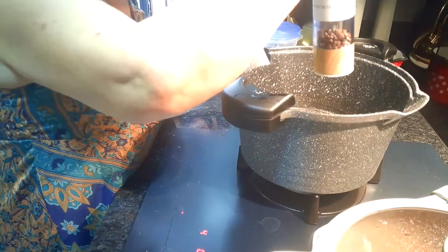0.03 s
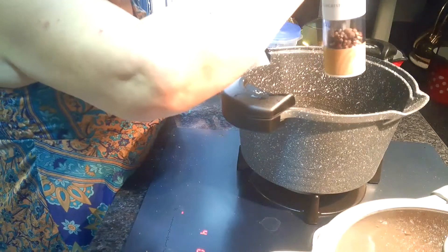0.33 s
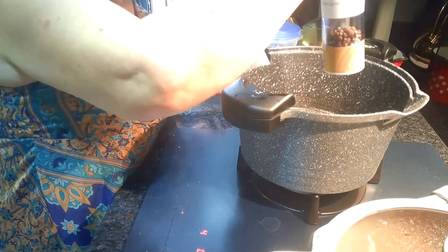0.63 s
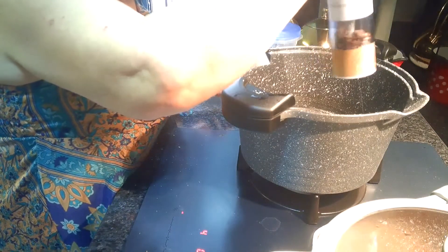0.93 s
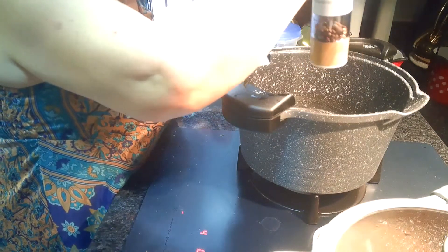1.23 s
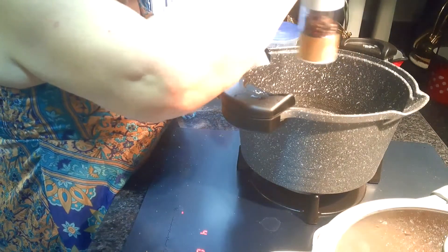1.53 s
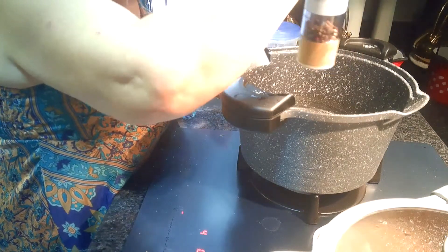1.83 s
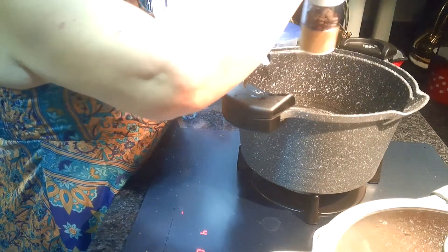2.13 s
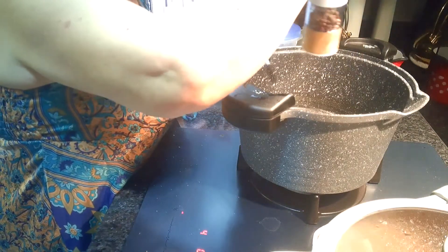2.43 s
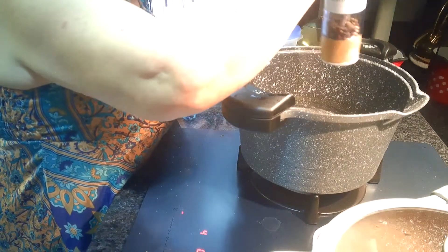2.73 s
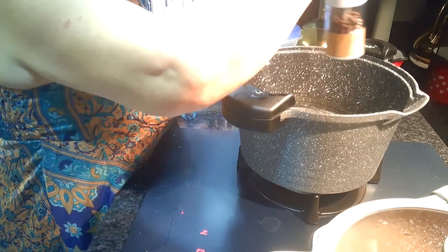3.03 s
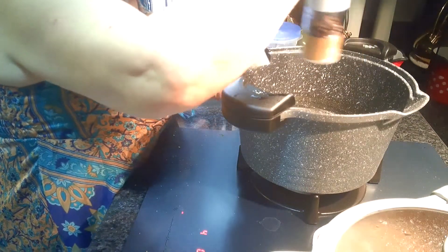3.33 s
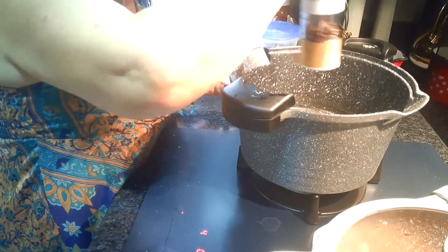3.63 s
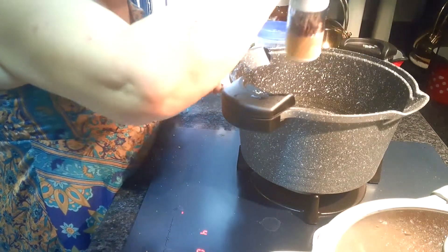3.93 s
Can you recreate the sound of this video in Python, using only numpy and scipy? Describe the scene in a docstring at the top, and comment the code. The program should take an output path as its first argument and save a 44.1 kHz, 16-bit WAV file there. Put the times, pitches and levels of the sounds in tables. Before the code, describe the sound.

A small electric spice grinder runs close by in a kitchen, its whine rising and sagging over a plastic gear chatter. Grains squeak faintly and crack now and then, loudest just past halfway as the motor strains.

```python
"""A small battery spice grinder runs over a pot in a kitchen. Its motor whines in harmonics of the
shaft rate, which sags as the burr bites. The gear teeth sing at multiples of the tooth rate, and their
impacts chatter through the resonances of the plastic housing. Now and then a grain squeaks under
friction or cracks. Short reflections follow the grinder; under it lie faint mains hum and room rumble."""
import sys
import numpy as np
from scipy import signal
from scipy.fft import rfft, irfft
from scipy.io import wavfile
from scipy.ndimage import uniform_filter1d

SR = 44100
rng = np.random.default_rng(int(sys.argv[2]) if len(sys.argv) > 2 else 0)


def unload_audio(sound):
    """Save the sound as a 16-bit wav file, at the path given as the first command line argument."""
    columns = np.transpose(np.atleast_2d(sound))
    # keep every value between -1 and 1, then stretch to whole-number steps
    steps = np.round(np.clip(columns, -1, 1) * 32767)
    wavfile.write(sys.argv[1], SR, steps.astype(np.int16))


N = 176400
T = np.arange(N) / SR
PINION_TEETH, TREBLE_FROM_HZ = 11, 3700

# mains harmonics: pitch_hz, level_db
HUM_PARTIALS = [(50, -55.3), (100, -63.5), (200, -69)]
# spectrum of the room rumble: frequency_hz, relative_db
RUMBLE_SPECTRUM = [(10, -10.5), (28, -3), (50, -7), (75, -10), (140, -13), (300, -16), (1000, -15.5),
                   (8000, -39)]
# grains rubbing the burr: start_s, length_s, level_db
SQUEAKS = [(.84, .04, -38), (1.08, .09, -39), (1.94, .11, -35), (3.07, .11, -33.5), (3.218, .02, -32),
           (3.235, .021, -25.5)]
# modes of the rubbed burr: pitch_hz, relative_db
BURR_MODES = [(2325, 2), (5550, 1), (7750, -7)]
# bright ticks of snapping grains: start_s, level_db
TICKS = [(2.202, -22), (2.398, -22), (3.259, -33), (3.643, -40)]
# spectrum of a tick: frequency_hz, relative_db
TICK_SPECTRUM = [(2000, -12), (4000, 2), (6500, 2), (10000, -1), (16000, -11)]
# grains breaking: start_s, level_db, decay_s, tilt_db_per_octave, relative_thump_db
CRACKS = [(.856, -30, .008, 0, -16), (2.086, -28, .009, -1, -9), (2.102, -34, .005, -3, 0),
          (2.2012, -8.5, .003, 1.5, -20), (2.2042, -10, .0032, 1.5, -18), (2.213, -24, .004, 0, -15),
          (2.398, -20, .003, 4, -12), (3.228, -18, .0025, -2, -10), (3.2562, -18, .002, 3, -20),
          (3.2582, -16.5, .005, 4, -14), (3.312, -23, .003, -3, -9), (3.508, -25, .003, -2, -9),
          (3.84, -25, .003, -3, -9)]
# response of the grinder's body to a knock: frequency_hz, relative_db
THUMP_SPECTRUM = [(60, -26), (170, -4), (260, -1.5), (500, 8), (900, 12), (1500, 8.5), (3000, -56)]
# response of the housing to impacts: frequency_hz, relative_db
HOUSING_SPECTRUM = [(100, -33), (330, -48.5), (470, -23.5), (570, -21.5), (720, -12.5), (1030, -10.5),
                    (1200, -13.5), (1430, -11.5), (1600, -2), (1900, -2), (2130, -7.5), (2330, -4.5),
                    (3000, -1.5), (3600, -5.5), (4200, -10), (4800, -10), (5650, -15), (6400, -12.5),
                    (7100, -18.5), (8200, -16.5), (9300, -20), (10800, -24), (11700, -36), (12800, -32),
                    (13800, -46), (16000, -44)]
# narrow housing resonances: pitch_hz, bandwidth_hz, relative_db
HOUSING_MODES = [(2320, 70, -16), (5570, 170, -14), (5930, 80, -19)]
# response of the housing to a tone: pitch_hz, gain_db
HOUSING_TONE_GAIN = [(200, -52), (420, -29.5), (520, -26), (595, -18.5), (680, -11.5), (900, -11.5),
                     (1150, -14.5), (1320, -6.5), (1470, -16), (1630, -5.5), (2020, -8), (2140, -12.5),
                     (2290, -7.5), (2900, -8), (3500, -16.5), (4000, -14.5), (4530, -18.5), (4850, -14.5),
                     (5600, -13.5), (6200, -26.5), (6900, -15.5), (7600, -17.5), (9300, -22), (11000, -40)]
# loudness of the gear train in two bands: time_s, middle_db, treble_db
GEAR_LEVELS = [(0.0, -29, -33), (0.07, -23.5, -28), (0.22, -28, -31.5), (0.51, -27, -30.5),
               (0.8, -27.5, -35), (0.82, -30.5, -36), (0.859, -24, -29), (0.88, -27.5, -35.5),
               (0.97, -29.5, -32.5), (1.01, -30, -36), (1.11, -26, -29), (1.39, -25.5, -29),
               (1.46, -29, -31.5), (1.54, -26, -29), (1.76, -28, -32), (1.84, -24.5, -31.5),
               (1.93, -30.5, -35), (1.989, -26, -30), (2.09, -27, -28), (2.12, -32, -33),
               (2.19, -28, -27.5), (2.209, -47, -22), (2.22, -33, -50), (2.24, -30, -34.5),
               (2.39, -26, -28.5), (2.42, -28.5, -31.5), (2.47, -25.5, -28.5), (2.52, -29, -31.5),
               (2.85, -24, -30), (2.87, -27.5, -34), (2.95, -25.5, -31), (3.06, -29, -35),
               (3.12, -26.5, -29), (3.19, -31, -32.5), (3.21, -29.5, -40), (3.23, -30, -31),
               (3.25, -28, -28.5), (3.29, -33, -38), (3.319, -24, -29), (3.43, -27.5, -31.5),
               (3.83, -25, -28.5), (3.88, -25.5, -31.5), (3.97, -24.5, -27), (4.0, -29, -28.5)]
# harmonics 2 and 3 of the tooth rate: time_s, second_db, third_db
SINGING_LEVELS = [(0, -37, -48), (.07, -33, -40), (.2, -36, -40), (.3, -37, -47), (.55, -42, -50),
                  (.75, -55, -56), (1.05, -55, -56), (1.16, -48, -42), (1.23, -47, -36), (1.3, -43, -42),
                  (1.38, -37, -43), (1.46, -50, -44), (1.53, -43, -37), (1.63, -45, -39), (1.75, -54, -54),
                  (1.95, -55, -54), (2.05, -42, -35), (2.12, -50, -48), (2.19, -37, -35), (2.25, -56, -52),
                  (2.36, -43, -42), (2.47, -36, -38), (2.55, -50, -40), (2.68, -52, -40), (2.85, -48, -45),
                  (3.12, -46, -48), (3.5, -56, -54), (3.62, -39, -41), (3.8, -38, -36), (3.94, -39, -34),
                  (4, -38, -37)]
# higher harmonics, which follow the third: tooth_harmonic, relative_db
SINGING_OVERTONES = [(4, -13), (5, -26)]
# emphasis of shaft orders at the gear tones: tooth_harmonic, lift_db
MESH_LIFTS = [(2, 2.5), (3, 4.5), (4, 4.5)]
# passing swells of single orders: shaft_order, start_s, length_s, lift_db
ORDER_SWELLS = [(3, 0, .28, 5), (23, .2, .45, 6), (3, .66, .38, 5), (19, 1.28, .2, 9), (20, 1.28, .18, 10),
                (23, 2.55, .7, 10), (3, 3.64, .4, 7), (19, 3.64, .4, 9), (20, 3.64, .4, 12)]
# rotation of the motor shaft: time_s, speed_turns_per_s
SHAFT_SPEED = [(0.0, 205.0), (0.06, 207.0), (0.16, 196.0), (0.29, 207.7), (0.45, 214.9), (0.51, 213.3),
               (0.81, 228.1), (0.87, 226.8), (1.06, 232.0), (1.12, 229.0), (1.27, 211.0), (1.33, 200.8),
               (1.41, 199.2), (1.51, 212.2), (1.64, 209.5), (1.76, 222.4), (1.95, 233.4), (2.04, 228.9),
               (2.09, 197.7), (2.12, 188.5), (2.16, 190), (2.2, 184), (2.24, 192), (2.27, 198.3),
               (2.35, 205.0), (2.5, 205.9), (2.55, 212.7), (2.79, 226.5), (2.87, 225.1), (3.1, 233.2),
               (3.16, 229.5), (3.22, 234.1), (3.4, 221.5), (3.46, 225.6), (3.6, 225.4), (3.68, 202.2),
               (3.82, 205.0), (3.85, 199.3), (3.93, 208.0), (4.0, 199.3)]


def amp(db):
    """Amplitude ratio of a level in decibels."""
    return 10 ** (np.asarray(db) / 20)


def unit(x):
    """Normalisation to an rms of 1."""
    return x / np.sqrt(np.mean(x ** 2) + 1e-20)


def response_db(spectrum, hz):
    """Interpolation of a response on a log-frequency axis."""
    frequencies, db = np.transpose(spectrum)
    return np.interp(np.log(hz + 1), np.log(frequencies), db)


def add(mix, start_s, sound):
    """Superposition of a sound on the mix."""
    part = mix[round(start_s * SR):][:len(sound)]
    part += sound[:len(part)]


def drift(rate_hz):
    """Random modulation: low-pass noise with an rms of 1."""
    hz = np.fft.rfftfreq(N, 1 / SR)
    return unit(irfft(rfft(rng.standard_normal(N)) / (1 + (hz / rate_hz) ** 2), N))


def colour(x, spectrum, tilt_db=0, size=4096):
    """Minimum-phase filtering at unit energy, with a treble tilt in dB per octave."""
    hz = np.fft.rfftfreq(size, 1 / SR)
    log_gain = np.log(amp(response_db(spectrum, hz) + tilt_db * np.log2(1 + hz / 1000)))
    log_response = np.conj(signal.hilbert(np.r_[log_gain, log_gain[-2:0:-1]]))
    taps = np.fft.ifft(np.exp(log_response)).real[:size // 2]
    return signal.fftconvolve(x, taps / np.linalg.norm(taps))[:len(x)]


def hum_and_rumble():
    """Steady background: harmonics of the mains frequency over low-pitched room noise."""
    hum = sum(amp(db) * np.sqrt(2) * np.sin(2 * np.pi * (hz * T + rng.random()))
              for hz, db in HUM_PARTIALS)
    return hum + amp(-52) * colour(rng.standard_normal(N), RUMBLE_SPECTRUM)


def reflections(x, t60_s):
    """Reverberation: convolution with sparse reflections that decay exponentially."""
    t = T[:SR // 2]
    taps = rng.standard_normal(len(t)) * (rng.random(len(t)) < .1) * (t > .001) * amp(-60 * t / t60_s)
    return signal.fftconvolve(x, taps / np.linalg.norm(taps))[:N]


def grain_squeaks(pitch_wobble=.015):
    """Friction: a trapped grain excites the burr's modes, which ring roughly over a scrape."""
    ring = sum(amp(db) * np.sin(2 * np.pi * np.cumsum(hz * (1 + pitch_wobble * drift(430))) / SR)
               for hz, db in BURR_MODES)
    pressure = np.zeros(N)
    for start, length, db in SQUEAKS:
        add(pressure, start, amp(db) * signal.windows.tukey(round(length * SR)))
    scrape = amp(-6) * colour(rng.standard_normal(N), HOUSING_SPECTRUM)
    return pressure * (ring + scrape)


def grain_ticks(decay_s=.0045):
    """Broadband transients: a brief noise burst is the bright edge of a snapping grain."""
    out, t = np.zeros(N), T[:SR // 20]
    for start, db in TICKS:
        burst = rng.standard_normal(len(t)) * np.exp(-t / decay_s)
        add(out, start, amp(db) * colour(burst, TICK_SPECTRUM))
    return out


def grain_cracks(rise_s=.00018, thump_decay_s=.01):
    """Brittle fracture: a breaking grain rings the housing and knocks the body."""
    out, t = np.zeros(N), T[:SR // 5]
    for start, db, decay, tilt_db, thump_db in CRACKS:
        snap, knock = rng.standard_normal((2, len(t))) * np.minimum(t / rise_s, 1)
        burst = colour(snap * np.exp(-t / decay), HOUSING_SPECTRUM, tilt_db)
        thump = colour(knock * np.exp(-t / thump_decay_s), THUMP_SPECTRUM)
        add(out, start, amp(db) * (burst + amp(thump_db) * thump))
    return out


def housing_ring(speed, middle_db, treble_db):
    """Resonance: noise-driven housing modes flare at random and grow as the motor runs free."""
    out = np.zeros(N)
    for hz, width, db in HOUSING_MODES:
        ring = signal.lfilter(*signal.iirpeak(hz, hz / width, fs=SR), rng.standard_normal(N))
        flare_db = .14 * (speed - speed.mean()) + 2.5 * np.tanh(drift(5))
        band_db = middle_db if hz < TREBLE_FROM_HZ else treble_db
        out += amp(db + flare_db + band_db) * unit(ring)
    return out


def gear_chatter(turns, middle_db, treble_db, jitter_teeth=.12, spread_db=4, grit_per_s=50):
    """Impact excitation: uneven tooth strikes, rubbing and grit in the burr drive the housing."""
    tooth = np.floor(np.maximum.accumulate(PINION_TEETH * turns + jitter_teeth * drift(900)))
    contacts = np.diff(tooth, prepend=tooth[0]) > 0
    strikes = contacts * amp(spread_db * rng.standard_normal(N)) * rng.choice([-1, 1], N)
    # tooth pressure peaks once a turn and flutters
    pressure = np.exp(.15 * np.cos(2 * np.pi * turns) + .09 * np.cos(4 * np.pi * turns))
    pressure *= amp(1.2 * np.tanh(drift(70)))
    rub = .7 * rng.standard_normal(N)
    teeth = colour(unit(pressure * (unit(strikes) + rub)), HOUSING_SPECTRUM)
    grit_hits = rng.random(N) < grit_per_s / SR
    impulses = unit(grit_hits * amp(2.4 * np.minimum(rng.exponential(1, N), 3)))
    grit = colour(impulses, HOUSING_SPECTRUM, tilt_db=7.5) + amp(-28) * colour(impulses, THUMP_SPECTRUM)
    sound = teeth + amp(-18.7) * grit
    middle = signal.sosfiltfilt(signal.butter(3, TREBLE_FROM_HZ, fs=SR, output="sos"), sound)
    return middle * amp(middle_db) + (sound - middle) * amp(treble_db)


def gear_singing(turns, judder_teeth=.027, judder_db=5, judder_hz=60, wobble_teeth=.03):
    """Phase and amplitude modulation: judder and pinion wobble roughen the tooth-rate harmonics."""
    times, *levels = np.transpose(SINGING_LEVELS)
    second_db, third_db = (np.interp(T, times, db) for db in levels)
    phase = PINION_TEETH * turns + judder_teeth * drift(judder_hz)
    phase += wobble_teeth * np.sin(2 * np.pi * turns)
    tones = [(2, second_db), (3, third_db)] + [(k, third_db + db) for k, db in SINGING_OVERTONES]
    out = np.zeros(N)
    for harmonic, db in tones:
        gain = amp(db + judder_db * np.tanh(drift(judder_hz)))
        out += gain * np.sin(2 * np.pi * (harmonic * phase + rng.random()))
    return out


def order_swell_db(order, speed):
    """Loading: the burr lifts orders 7 to 11 as the speed sags; single orders also swell briefly."""
    db = np.interp(speed, [203, 228], [5, 1.5]) * (7 <= order <= 11)
    for swelling_order, start, length, lift_db in ORDER_SWELLS:
        if swelling_order == order:
            add(db, start, lift_db * signal.windows.tukey(round(length * SR)))
    return db


def motor_whine(speed, turns, middle_db, treble_db, sideband_share=.55, waver_db=2.4):
    """Forced vibration: harmonics of the shaft rate (orders) sweep through the housing's resonances."""
    falter_turns = np.interp(speed, [189, 197], [.045, .0026])  # the shaft falters near a stall
    shaft_phase = turns + falter_turns * drift(27)
    strain_db = .6 * (treble_db - treble_db.mean())
    out = np.zeros(N)
    for order in range(2, 49):
        mean_hz = order * speed.mean()
        band_db = middle_db if mean_hz < TREBLE_FROM_HZ else treble_db
        follow = np.interp(mean_hz, [1100, 1650], [.15, 1])  # low orders barely follow the load
        load_db = band_db.mean() + follow * (band_db - band_db.mean())
        # an off-centre pinion spreads each gear tone's lift to the neighbouring orders
        mesh_db = sum((db + strain_db) * sideband_share ** abs(order - harmonic * PINION_TEETH)
                      for harmonic, db in MESH_LIFTS)
        housing_db = response_db(HOUSING_TONE_GAIN, order * speed)
        level_db = housing_db + mesh_db + order_swell_db(order, speed) + load_db
        # shaft shudder blurs the upper orders
        blur = np.interp(mean_hz, [3000, 7000], [0, .25]) * drift(50)
        scatter = .22 * rng.standard_normal()  # phases lie near enough to buzz once a turn
        phase = order * shaft_phase + blur + scatter
        out += amp(level_db + waver_db * drift(12)) * np.cos(2 * np.pi * phase)
    return out


def scene():
    """Superposition: the grinder, driven by one shaft, with its reflections and the background."""
    speed = uniform_filter1d(np.interp(T, *np.transpose(SHAFT_SPEED)), size=1200)
    turns = np.cumsum(speed) / SR
    times, *levels = np.transpose(GEAR_LEVELS)
    middle_db, treble_db = (np.interp(T, times, db) for db in levels)
    treble_db += 4
    grinder = amp(-7) * motor_whine(speed, turns, middle_db, treble_db)
    grinder += amp(-4.7) * gear_chatter(turns, middle_db, treble_db)
    grinder += housing_ring(speed, middle_db, treble_db)
    grinder += grain_cracks() + grain_ticks() + grain_squeaks()
    grinder += amp(1) * gear_singing(turns)
    return (grinder + amp(-9.5) * reflections(grinder, t60_s=.13) + hum_and_rumble())[None]


def record(dry, ceiling=.7, cutoff_hz=15900):
    """Soft saturation rounds the loudest peaks; a low-pass filter limits the band."""
    limited = dry / (1 + (dry / ceiling) ** 6) ** (1 / 6)
    lowpass = signal.firwin(511, cutoff_hz, window=("kaiser", 9), fs=SR)
    return signal.oaconvolve(limited, lowpass[None], "same")


dry = scene()
out = record(dry)
unload_audio(out)
```